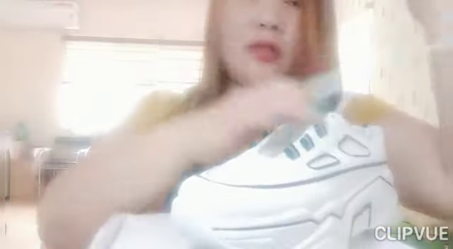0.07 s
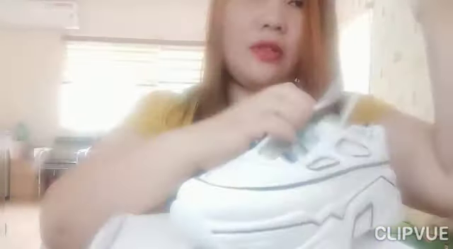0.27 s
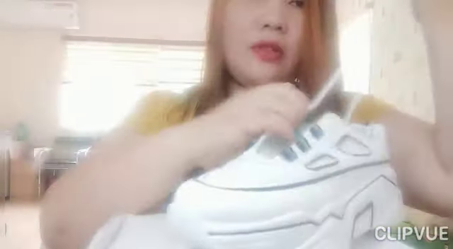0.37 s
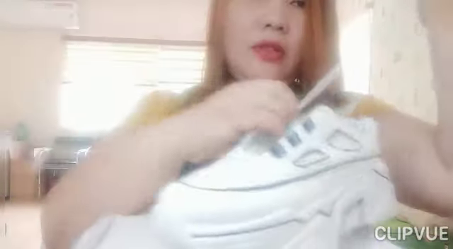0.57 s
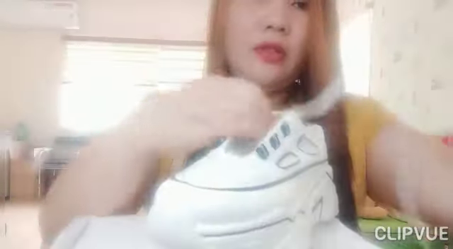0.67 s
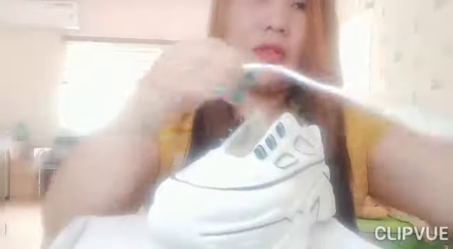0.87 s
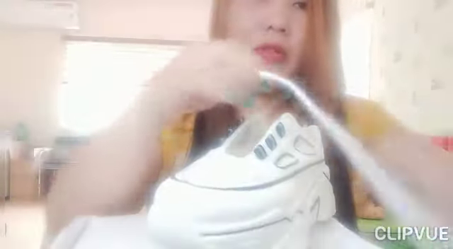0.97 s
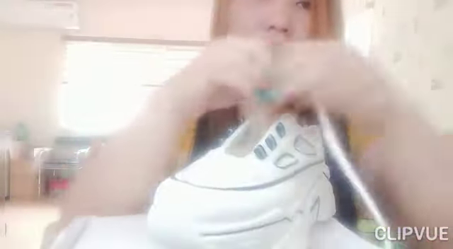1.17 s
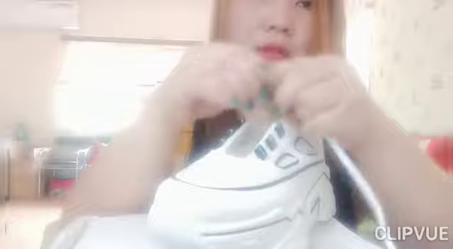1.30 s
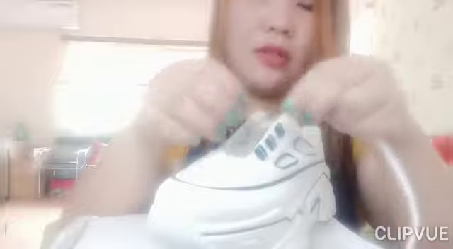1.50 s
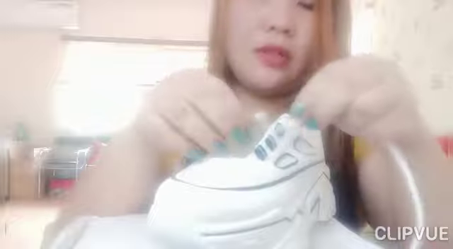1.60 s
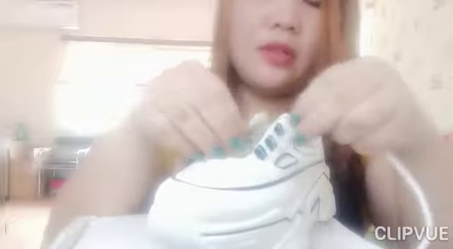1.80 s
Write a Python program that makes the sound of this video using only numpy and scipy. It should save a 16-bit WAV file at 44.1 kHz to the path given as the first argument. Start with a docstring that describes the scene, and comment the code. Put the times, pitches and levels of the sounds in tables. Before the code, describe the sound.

Light clicks, soft bumps and rustles of a sneaker being laced in a quiet room.

```python
"""A small, quiet room, where a sneaker is laced on a table close to the microphone.
A fan-like rush and a faint motor hum lie under everything. Fingers bump the hollow shoe and
knock on its upper, exciting damped resonances. The lace rubs through the holes as friction
noise, and its hard tip clicks against the eyelets, echoed by the table and the room."""
import sys
import numpy as np
from scipy import signal
from scipy.fft import rfft, irfft, next_fast_len
from scipy.io import wavfile

SR = 44100
rng = np.random.default_rng(int(sys.argv[2]) if len(sys.argv) > 2 else 0)


def wrap_up_sound(samples):
    """Save the sound to the file named by the first command line argument, as 16-bit audio."""
    columns = np.atleast_2d(samples).T
    # keep every value between -1 and 1, then stretch to whole-number steps
    tamed = np.clip(columns, -1, 1)
    steps = np.round(tamed * 32767).astype(np.int16)
    wavfile.write(sys.argv[1], SR, steps)


N = 81585
TIME = np.arange(N) / SR


def amp(db):
    """Amplitude ratio of a level in decibels."""
    return 10 ** (np.asarray(db) / 20)


def unit_rms(x):
    """Normalisation to an rms of 1."""
    return x / np.sqrt(np.mean(x ** 2) + 1e-20)


def colour(x, points):
    """Minimum-phase filtering through (f/Hz, gain/dB) points, by folding the cepstrum."""
    size = 2 * next_fast_len(len(x))
    hz, db = np.transpose(points)
    freqs = np.maximum(np.arange(size // 2 + 1) * SR / size, 1)
    gain = amp(np.interp(np.log(freqs), np.log(hz), db))
    cepstrum = irfft(np.log(gain))
    cepstrum[1:size // 2] *= 2
    cepstrum[size // 2 + 1:] = 0
    return irfft(rfft(x, size) * np.exp(rfft(cepstrum)))[:len(x)]


def drift(per_s):
    """Slow random modulation: linear interpolation between Gaussian values."""
    knots = rng.standard_normal(200)
    return np.interp(TIME * per_s, np.arange(len(knots)), knots)


def ring(x, hz, t60):
    """Damped resonator: a unit impulse starts a unit sinusoid that falls 60 dB in t60 seconds."""
    r, w = amp(-60 / (t60 * SR)), 2 * np.pi * hz / SR
    return signal.lfilter([1, 0, -1], [1, -2 * r * np.cos(w), r * r], x + 1e-18) / 2


def add(out, s, sound):
    """Superposition: a sound joins the mix at s seconds."""
    start = int(np.clip(s * SR, 0, N - 1))
    out[start:start + len(sound)] += sound[:N - start]


def room_tone():
    """Broadband air noise plus motor tones under random amplitude and phase modulation."""
    # spectrum of the rush: f/Hz, power density/dB
    rush_spectrum = [(25, -104), (50, -94.5), (105, -77.5), (200, -76.5), (275, -81.5), (390, -78),
                     (520, -79), (600, -85), (760, -90), (940, -81.5), (1600, -82.5), (2400, -81),
                     (3200, -83.5), (4100, -90), (5400, -108), (6800, -109), (8200, -114), (9300, -126),
                     (15000, -128)]
    # motor tones: f/Hz, carrier rms level/dB, modulation depth
    motor_tones = [(157.2, -55.5, 0.06), (314, -67.5, 0.41), (355.3, -56.5, 0.28), (386.7, -62, 0.8),
                   (476, -67.5, 0)]
    rush = colour(rng.standard_normal(N + SR // 2), rush_spectrum)[-N:] * np.sqrt(SR / 2)
    hum = np.zeros(N)
    for hz, db, depth in motor_tones:
        waver = 1 + depth * (drift(per_s=10.25) + 1j * drift(per_s=10.25))
        hum += amp(db) * np.sqrt(2) * np.real(waver * np.exp(2j * np.pi * hz * TIME))
    return rush + hum


def shoe_bumps():
    """Free vibration: a soft push sets the hollow shoe ringing low, with a weak, shorter overtone."""
    # finger bumps: t/s, level/dB, f/Hz, T60/s
    bumps = [(0.084, -31, 156.8, 0.23), (0.109, -36, 132, 0.12), (.143, -27, 153, 0.11),
             (0.187, -34, 105, 0.12), (.222, -24.5, 148, 0.12), (0.253, -26.5, 160, 0.073),
             (0.307, -43, 116, 0.12), (.394, -32, 125, 0.065), (.422, -37, 106, 0.061),
             (0.512, -24, 166, 0.033), (.560, -19.5, 123, 0.067), (0.578, -26, 115, 0.12),
             (0.609, -30, 133, 0.081), (0.639, -39, 105, 0.13), (1.017, -36, 115, .09),
             (1.243, -36, 148.6, 0.35), (1.262, -37, 145, 0.26), (1.291, -29.5, 127, 0.071),
             (1.337, -47, 108, 0.41), (1.54, -31.5, 157, 0.072), (1.563, -35.5, 127, 0.083)]
    attack_s, overtone_ratio, overtone_db, bass_cut_hz = 0.0028, 2.63, -17, 44
    out, t = np.zeros(N), TIME[:SR // 2]
    for s, db, hz, t60 in bumps:
        decay = amp(-60 * t / t60)
        phase = 2 * np.pi * hz * t
        body = decay * np.sin(phase) + amp(overtone_db) * decay ** 2 * np.sin(overtone_ratio * phase)
        add(out, s, amp(db) * body * (1 - np.exp(-t / attack_s)))
    # so small a source radiates no deep bass
    return signal.sosfilt(signal.butter(3, bass_cut_hz, "high", fs=SR, output="sos"), out)


def fibre_slips(per_s=2500, spread_db=2):
    """Stick-slip friction: fibres give a dense random train of impulses, uneven in size."""
    sizes = amp(spread_db * np.minimum(rng.exponential(1, N), 3)) * rng.choice([-1, 1], N)
    return sizes * (rng.random(N) < per_s / SR)


def lace_rubs():
    """Friction noise swells and fades in three bands; overlapping rubs add in power."""
    # rubs: peak t/s, rise/s, fall/s, rustle level/dB, rasp level/dB, hiss level/dB
    rubs = [(.090, 0.0035, 0.031, -51, -76, -92), (.142, 0.016, 0.0093, -43.5, -68.5, -85),
            (.198, .005, 0.013, -47, -69, -71), (.216, 0.0051, 0.0061, -34.5, -68, -84),
            (0.251, 0.026, 0.025, -40.5, -63, -74), (.331, 0.012, 0.11, -53, -69, -76),
            (.450, 0.045, 0.15, -48.5, -78, -93), (.668, 0.067, 0.024, -49, -74, -77),
            (.896, 0.0029, 0.016, -52, -59.5, -73), (1.038, 0.014, .025, -50, -65, -78),
            (1.078, 0.0089, 0.0072, -68, -63.5, -83), (1.264, .002, 0.0042, -51, -70, -50.5),
            (1.271, 0.019, 0.0082, -41.5, -61.5, -67), (1.285, 0.0026, 0.0081, -35.5, -48, -66),
            (1.415, 0.014, 0.0095, -72, -80, -85), (1.555, 0.0096, 0.019, -51, -74, -83),
            (1.780, .030, .070, -51, -79, -96)]
    # spectra of the upper's rustle, the fibres' rasp and the fine hiss: f/Hz, gain/dB
    rustle = [(100, -12.5), (350, 9), (550, -4), (720, 5), (1100, 1), (1700, -0.5), (3400, -2.5),
              (4300, -14), (5500, -39)]
    rasp = [(2500, -15), (4300, 7), (5500, 1.5), (6500, 6.5), (8200, 1.5), (10000, -14), (15000, -31)]
    hiss = [(7000, -28), (10000, -4), (12000, -4), (14000, 0), (15500, -1.5)]
    out = np.zeros(N)
    for band, spectrum in enumerate((rustle, rasp, hiss)):
        power = np.zeros(N)
        for s, rise, fall, *levels_db in rubs:
            envelope = np.exp(-np.maximum((s - TIME) / rise, (TIME - s) / fall))
            power += (amp(levels_db[band]) * envelope) ** 2
        out += np.sqrt(power) * unit_rms(colour(fibre_slips(), spectrum))
    return out


def finger_knocks():
    """Modal excitation of the upper: the softer the fingertip's touch, the fewer high modes answer."""
    # knocks: t/s, level/dB, cut-off of the force pulse f/Hz
    knocks = [(0.2137, -25.5, 480), (0.2218, -28, 404), (0.5124, -38.5, 497), (1.2705, -39.5, 1700),
              (1.2863, -33, 1860)]
    # modes of the upper: f/Hz, relative level/dB, T60/s
    upper_modes = [(330, -6, 0.13), (539, -2, 0.072), (721, -10, 0.12), (976, 0.5, .04), (1232, 2, 0.036),
                   (1500, -10, 0.053), (3270, 10.5, .03)]
    out = np.zeros(N)
    for s, db, cut_hz in knocks:
        force = signal.lfilter(*signal.butter(2, cut_hz, fs=SR), signal.unit_impulse(SR // 4))
        knock = sum((-1) ** k * amp(mode_db) * ring(force, hz, t60)
                    for k, (hz, mode_db, t60) in enumerate(upper_modes))
        add(out, s, amp(db) * knock)
    return out


def lace_tip_clicks():
    """Impact: tip and shoe ring briefly, heard directly and by reflection from table and room."""
    # clicks: t/s, level/dB, direct gain/dB, struck spot's f/Hz, its gain/dB,
    # body gain/dB, treble gain/dB, top gain/dB
    clicks = [(0.2406, -35.5, -17, 1850, 18.5, 11, -14, -11), (0.2539, -7, 0.5, 2280, 3, -0.5, -4, -2.5),
              (.2668, -7.5, -1.5, 2140, -12, -0.5, 0.5, -10), (0.9841, -18, -6, 2970, -0.5, 2.5, 2, 3),
              (0.9944, -25, -10, 2500, -4, -5, -6, -2), (1.019, -26, -2, 2600, -3, 4, 5.5, 0),
              (1.033, -32, -31, 2900, 11.5, -9, -6, 8), (1.0827, -36.5, 0, 2900, 4, -11, 6, 3),
              (1.2708, -25, -9, 2290, -3, 10, 4, 4)]
    # modes of tip and shoe: f/Hz, relative level/dB, T60/s
    tip_modes = [(380, -38, 0.02), (947, -28.5, 0.033), (1270, -33, 0.037), (1422, -21, 0.025),
                 (1890, -4.5, 0.0088), (2138, -21, 0.034), (2385, -6, 0.005), (2783, -23, 0.021),
                 (3380, -19.5, 0.022), (4050, -11, 0.0054)]
    # filter common to all clicks, weak above 4.5 kHz: f/Hz, gain/dB
    click_colour = [(100, 8), (1000, -1), (2800, 1), (3600, 0), (4400, -1), (5000, -9.5), (5500, -21),
                    (7500, -17.5), (10000, -24), (12500, -27), (15000, -11)]
    # filter of the reflected sound: f/Hz, gain/dB
    echo_colour = [(100, -8), (400, 15), (700, 3.5), (1000, 8), (2200, -5.5), (3200, 4), (4400, -3),
                   (7000, 5.5), (15000, -3)]
    body_hz, treble_hz = 1060, 5000
    contact_db, scatter_db, room_db = -12.5, -2, -9.5
    table_delay_s, table_db = 0.0046, -15
    out, impulse = np.zeros(N), signal.unit_impulse(SR // 2)
    ringing = sum(amp(db) * ring(impulse, hz, t60) for hz, db, t60 in tip_modes)
    impact = colour(ringing + amp(contact_db) * impulse, click_colour)
    for s, db, direct_db, spot_hz, spot_db, body_db, treble_db, top_db in clicks:
        balance = [(body_hz, body_db), (2 * body_hz, 0), (treble_hz / np.sqrt(2), 0),
                   (treble_hz, treble_db), (treble_hz * np.sqrt(2), treble_db), (2 * treble_hz, top_db)]
        click = colour(impact, balance)
        click = click + amp(spot_db) * signal.lfilter(*signal.iirpeak(spot_hz, Q=3.17, fs=SR), click)
        scatter = amp(scatter_db) * echoes(t60=0.03)  # off shoe, hands and table
        reflections = colour(scatter + amp(room_db) * echoes(t60=0.39), echo_colour)
        add(out, s, amp(db) * signal.fftconvolve(click, amp(direct_db) * impulse + reflections))
        add(out, s + table_delay_s, amp(db + direct_db + table_db) * click)
    return out


def echoes(t60, onset_s=0.001):
    """Diffuse reverberation: dense reflections decay exponentially; the response has unit energy."""
    t = TIME[:SR // 2]
    build_up = 1 - np.exp(-(t / onset_s) ** 2)
    tail = rng.standard_normal(len(t)) * amp(-60 * t / t60) * build_up
    return tail / np.sqrt(np.sum(tail ** 2))


def scene():
    """Superposition of lace, shoe and room at one microphone."""
    return (lace_tip_clicks() + finger_knocks() + shoe_bumps() + lace_rubs() + room_tone())[None]


def record(dry):
    """Band limiting: a steep low-pass follows a short fade-in."""
    fade_s, cutoff_hz = 0.005, 15650
    low_pass = signal.ellip(10, .1, 70, cutoff_hz, fs=SR, output="sos")
    return signal.sosfilt(low_pass, dry * np.minimum(TIME / fade_s, 1))


dry = scene()
out = record(dry)
wrap_up_sound(out)
```